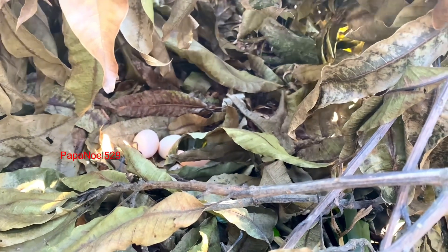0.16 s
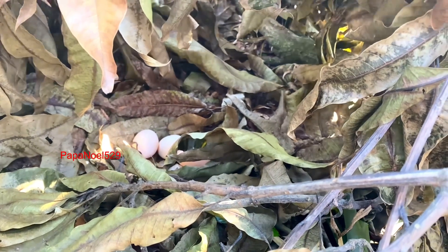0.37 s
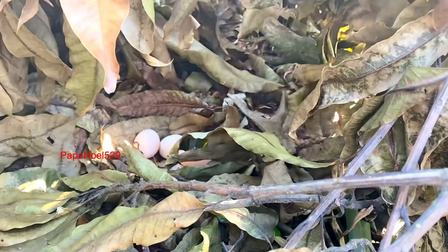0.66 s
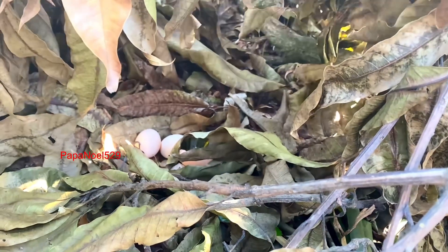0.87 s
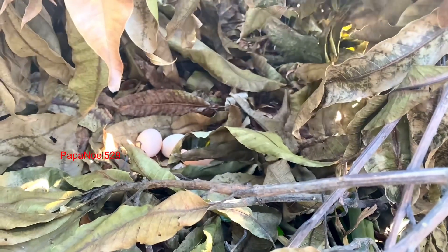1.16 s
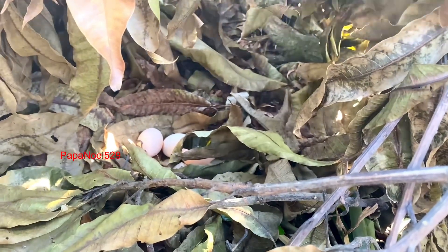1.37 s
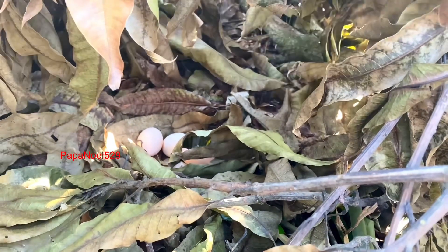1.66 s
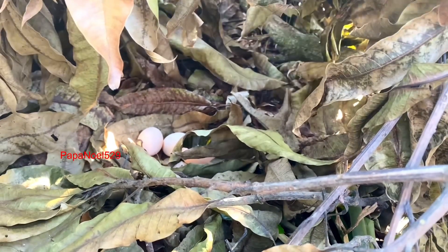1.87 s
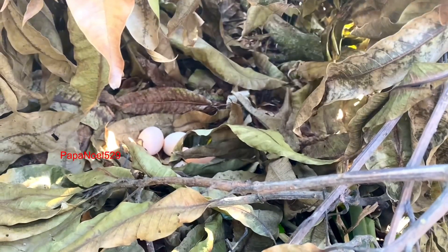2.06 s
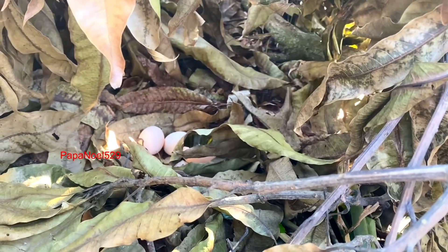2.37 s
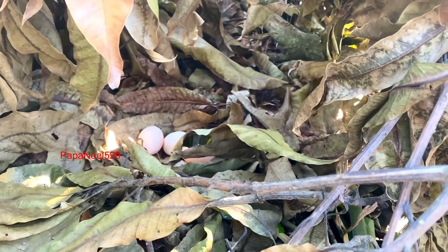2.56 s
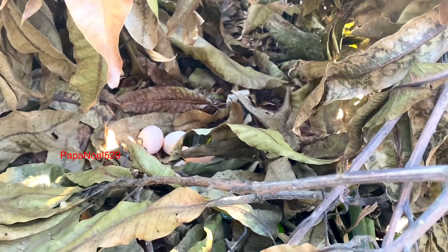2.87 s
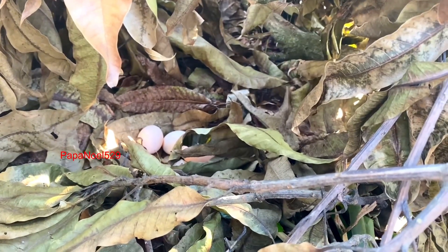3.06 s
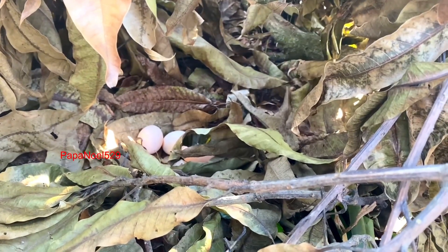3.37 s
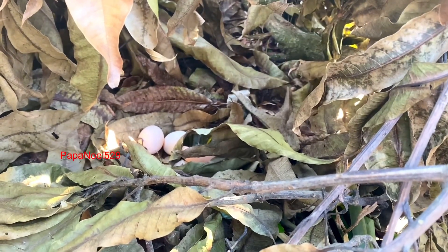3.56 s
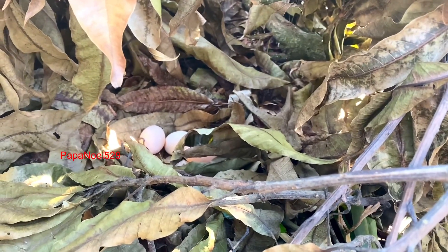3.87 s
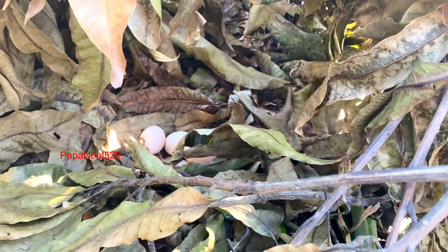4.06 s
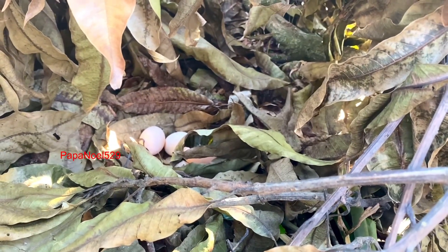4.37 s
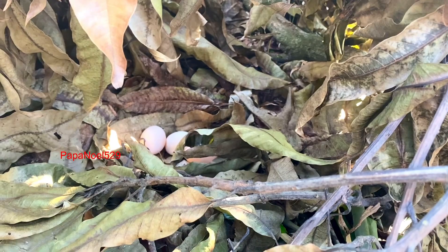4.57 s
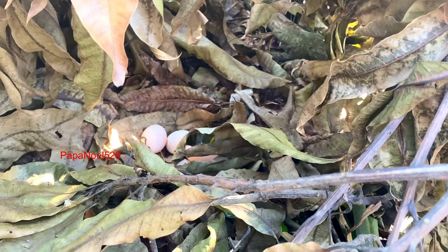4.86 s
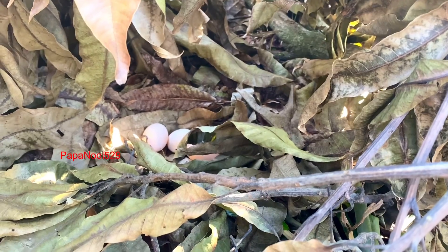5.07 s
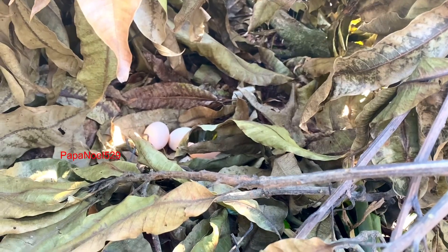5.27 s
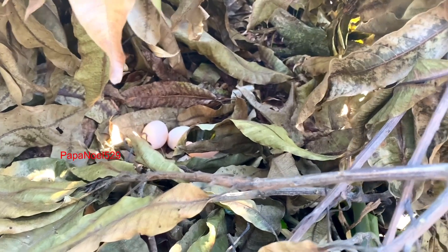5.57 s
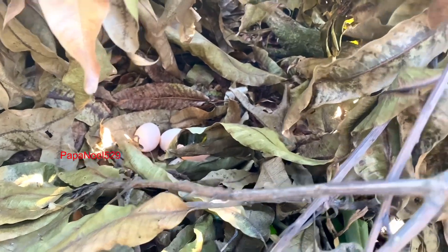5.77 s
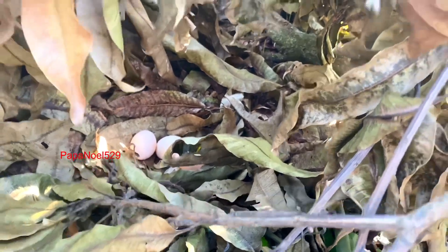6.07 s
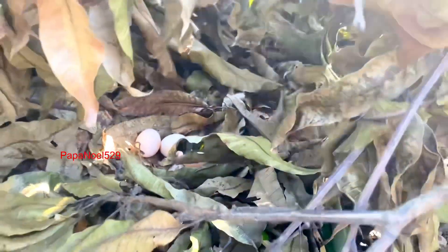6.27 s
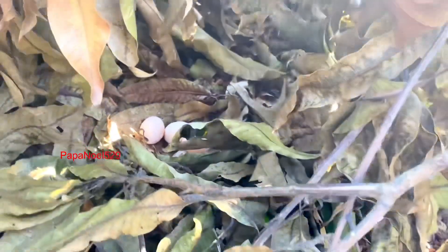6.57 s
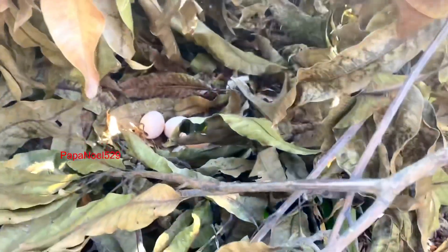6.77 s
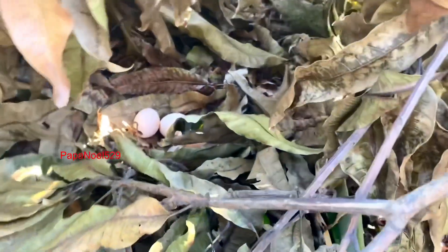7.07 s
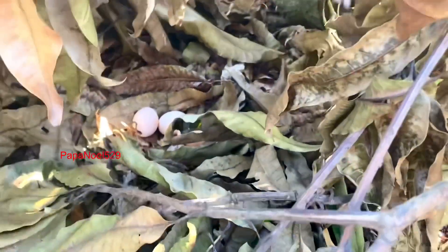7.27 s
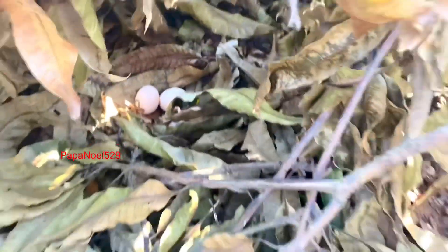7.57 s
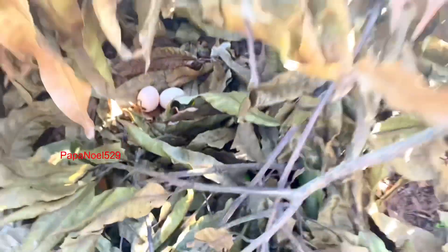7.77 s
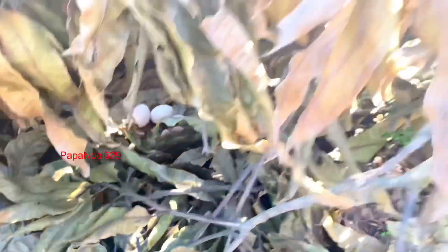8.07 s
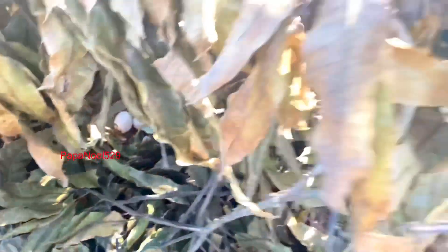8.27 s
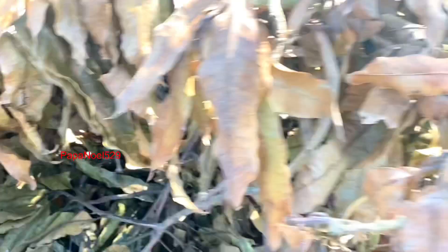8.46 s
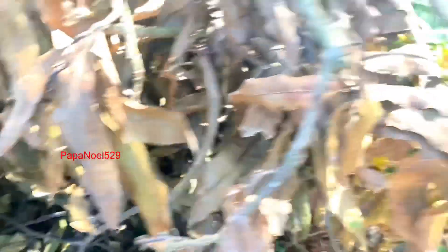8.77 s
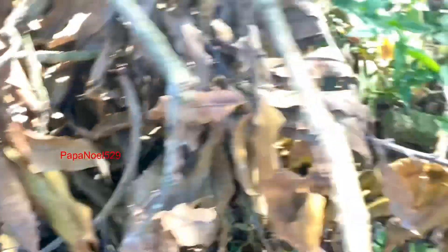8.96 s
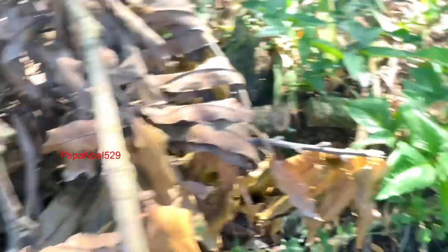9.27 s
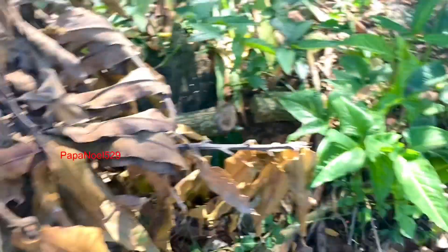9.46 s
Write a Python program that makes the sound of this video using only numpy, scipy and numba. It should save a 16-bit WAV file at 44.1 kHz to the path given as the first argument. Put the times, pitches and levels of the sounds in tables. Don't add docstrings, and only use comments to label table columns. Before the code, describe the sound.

Two hens cackle in turn, quick steady clucks breaking into harsh squawks, while a hand rustles dry leaves and snaps twigs close by.

```python
import sys
import numpy as np
from scipy import signal
from scipy.fft import rfft, irfft, next_fast_len
from scipy.io import wavfile
from scipy.ndimage import uniform_filter1d, map_coordinates
from numba import njit

SR = 44100
rng = np.random.default_rng(int(sys.argv[2]) if len(sys.argv) > 2 else 0)


def elevation(decibels):
    levels = np.asarray(decibels, float)
    return 10 ** (levels / 20)


def wav_record(signal):
    frames = np.transpose(np.atleast_2d(signal))
    bounded = np.clip(frames, -1, 1)
    quanta = np.round(bounded * 32767).astype(np.int16)
    wavfile.write(sys.argv[1], SR, quanta)


N = 424683
TIME = np.arange(N) / SR


def curve(rows):
    s, *columns = np.transpose(rows)
    return [np.interp(TIME, s, c) for c in columns]


def unit(x):
    return x / np.sqrt(np.mean(x ** 2))


def colour(x, points, turn=((60, 0), (200, 0))):
    size = next_fast_len(N)
    log_hz = np.log(np.maximum(np.fft.rfftfreq(size, 1 / SR), 1))

    def at(rows):
        hz, value = np.transpose(rows)
        return np.interp(log_hz, np.log(hz), value)

    spectrum = rfft(x, size) * elevation(at(points)) * np.exp(-1j * at(turn))
    return irfft(spectrum, size)[..., :N]


@njit
def svf(x, g, k):
    y, b, l = np.empty(len(x)), 0., 0.
    for i in range(len(x)):
        v = (b + g[i] * (x[i] - l)) / (1 + g[i] * (g[i] + k[i]))
        b, l, y[i] = 2 * v - b, l + 2 * g[i] * v, k[i] * v
    return y


def steep(x, hz, width):
    g, k = np.tan(np.pi * hz / SR), 1.55 * width / hz
    return svf(svf(x + 1e-18, g, k), g, k)


def walk(rate):
    k = int(SR / rate)
    steps = np.repeat(rng.standard_normal(N // k + 1), k)
    return 1.3 * uniform_filter1d(uniform_filter1d(steps, k), k)[:N]


# (time [s], level [dB])
HUM = [(0, -49.5), (1.5, -47.5), (3.6, -50), (5.2, -55), (7.2, -63.5), (9.63, -59)]
# (time [s], level [dB])
WIND = [(0, -57), (3, -62), (6.5, -53.5), (9.63, -55)]
# (time [s], rise above the wind [dB])
GUSTS = [
    (3.261, 16),
    (3.46, 9),
    (7.5, 7.2),
    (7.59, 11.3),
    (8.1, 5.1),
]
# (frequency [Hz], density [dB per Hz])
YARD = [(130, 1), (300, -15.5), (500, -11), (900, -10), (1450, -61), (2600, -31), (3200, -13.5),
        (3900, -36.5), (7000, -64.5), (16000, -56.5)]


def background():
    hum_hz, wander_hz, gust_s, yard_db = 98.9, 0.7, 0.046, -62.5
    hum_phase = 2 * np.pi * np.cumsum(hum_hz + wander_hz * walk(4)) / SR
    hum = np.sqrt(2) * np.sin(hum_phase) * elevation(curve(HUM)[0] + 1.5 * walk(9))
    hum = hum * elevation(np.array([[-.9], [.9]]))

    wind_db = curve(WIND)[0]
    for s, rise_db in GUSTS:
        wind_db = wind_db + rise_db * np.exp(-((TIME - s) / gust_s) ** 2)
    rumble = [(12, -53.5), (30, -27.0), (55, -5.0), (85, -3.0), (125, -14.5), (300, -23.5), (2000, -93.5)]
    mid, side = colour(rng.standard_normal((2, N)), rumble)
    wind = unit(mid + 0.12 * side * np.array([[1], [-1]])) * elevation(wind_db + 2.0 * walk(9.7))

    hiss = unit(colour(rng.standard_normal((2, N)), [(60, 2.7)] + YARD))
    return hum + wind + hiss * elevation(yard_db + 0.5 * walk(5.7))


# (time [s], rustle level [dB])
LEAVES = [(0, -68.5), (.2, -53), (.6, -60), (1.2, -60), (2.1, -65.5), (2.75, -76.5), (3.8, -84),
          (4.85, -76.5), (5.0, -71.5), (5.45, -70), (6.1, -57), (6.9, -60), (6.95, -51.5), (7.75, -53.5),
          (8.0, -54), (8.4, -61), (8.52, -48.5), (9.46, -64.5), (9.54, -49)]
# (frequency [Hz], density [dB per Hz])
LEAF_COLOUR = [(90, -49.5), (170, -4.5), (760, 1.5), (3770, 1), (6000, 0), (11900, -4.5), (16000, -4)]


def rustle():
    struck = rng.random((2, N)) < 5000 / SR
    grains = struck * elevation(2.3 * rng.exponential(size=(2, N))) * rng.standard_normal((2, N))
    bed = unit(grains) + 0.72 * rng.standard_normal((2, N))
    bed = colour(bed + 0.04 * bed[::-1], LEAF_COLOUR)
    return unit(bed) * elevation(curve(LEAVES)[0] + 12.5 + 3.04 * walk(35) + 3.0 * walk(9))


# (time [s], peak level [dB], ring frequency [Hz], crush length [s])
SNAPS = [(0.0991, -27, 7100, 0.0066), (0.1441, -32.5, 7020, 0.0045), (0.205, -21, 6440, 0.004),
         (0.414, -37.5, 6870, 0.0073), (0.467, -27, 6170, 0.006), (0.8111, -32, 3020, 0.006),
         (0.875, -45, 3190, 0.006), (0.909, -29.5, 4000, 0.0082), (0.967, -24.5, 2990, 0.005),
         (1.29, -56, 3220, 0.006), (1.3543, -26, 3090, 0.0066), (1.372, -32, 3800, 0.006),
         (1.7878, -40, 3500, 0.006), (1.8064, -32, 4390, 0.0073), (3.6034, -49.5, 3620, 0.0084),
         (5.2994, -43, 6900, 0.0065), (6.0881, -52, 4420, 0.0053), (6.107, -42, 4280, 0.006),
         (6.6578, -39, 5170, 0.006), (6.9333, -38, 6350, 0.0055), (6.94, -23, 3990, 0.01),
         (7.103, -40, 4220, 0.006), (7.177, -24, 3095, 0.0068), (7.806, -32, 4960, 0.0053),
         (7.8743, -24, 3970, 0.0066), (7.907, -19, 4860, 0.0046), (7.947, -22, 4900, 0.006),
         (7.9827, -26, 7600, 0.0043), (8.4267, -36, 3200, 0.0054), (8.5066, -47, 6710, 0.0065),
         (8.5116, -33, 2620, 0.006), (8.777, -21, 5340, 0.006), (8.982, -44, 5680, 0.006),
         (9.511, -35.5, 7380, 0.006), (9.593, -17.5, 3160, 0.0067)]


def snaps():
    out = np.zeros((2, N))
    t = np.arange(3000) / SR
    for s, peak_db, hz, crush_s in SNAPS:
        crack = rng.standard_normal((2, len(t)))
        decay = np.exp(-t / max(crush_s, 1e-3)) + 0.18 * np.exp(-t / 0.13)
        burst = (crack + 0.12 * crack[::-1]) * decay * np.clip(t / 0.0015, 0, 1)
        ring = signal.lfilter(*signal.iirpeak(hz, 3.0, fs=SR), burst)
        bright = signal.lfilter([1, -.75], [1], 0.62 * burst + 3.06 * ring)
        i = int(s * SR)
        out[:, i:i + len(t)] += (bright * elevation(peak_db - 7.0))[:, :N - i]
    return out


# (share of length, pulse rate [Hz], level [dB])
CLUCK = [(-.22, 155, -37), (-.2, 162, -17), (.1, 217.6, -7.5), (.4, 245.2, 4), (0.551, 424, -1),
         (.85, 457, -2), (1.05, 372.8, -7), (1.199, 325.6, -23.5)]


def add_cluck(c, cluck, chest_db, rough):
    share, rate_hz, shape_db = np.transpose(CLUCK)
    s, length, peak_db, throat_hz = cluck
    on = slice(int((s + share[0] * length) * SR), int((s + share[-1] * length) * SR))
    u = (TIME[on] - s) / length
    c["db"][on] = peak_db + np.interp(u, share, shape_db)
    chance = 1 + .04 * rng.standard_normal()
    c["hz"][on] = np.interp(u, share, rate_hz) * throat_hz / 900 * chance
    c["half"][on], c["third"][on], c["rough"][on] = .15, 0, rough
    c["throat"][on], c["chest_db"][on] = throat_hz / 960, chest_db


# (time from start [s], level [dB])
ONSET = [(-.004, -22), (0, -29), (.008, -3.5), (.05, 0.5)]
# (time from end [s], level [dB])
OFFSET = [(0, -0.5), (.015, -7.5), (.035, -15.5), (.045, -19), (.08, -26)]


def add_squawk(c, squawk, tuning, vowel, syrinx, effort, throat):
    start, end, level_db, clear_s, hoarse = squawk
    pitch, tune, first_db, stretch = tuning
    on = slice(int((start + ONSET[0][0]) * SR), int((end + OFFSET[-1][0]) * SR))
    t = TIME[on] - start
    broken = 1 + (t - clear_s) / (end - start - clear_s)
    phase = np.where(t < clear_s, t / clear_s, broken)

    def at(rows):
        points, *columns = np.transpose(rows)
        return [np.interp(phase, points, column) for column in columns]

    hz, half, third, rough, strain = at(syrinx)
    c["hz"][on], c["half"][on] = hz * pitch, half
    c["rough"][on] = rough + hoarse * strain
    c["third"][on] = np.minimum(third + 2.5 * hoarse * np.minimum(strain, 1), .75)
    ends_db = np.interp(t, *np.transpose(ONSET)) + np.interp(TIME[on] - end, *np.transpose(OFFSET))
    push_db, open_db, neck = at(effort)
    c["db"][on] = level_db + push_db + ends_db + first_db * np.clip(4 - 4 * phase, 0, 1)
    c["beak_db"][on] = open_db + 0.048 * ends_db
    c["neck"][on], c["throat"][on] = neck * stretch, throat * tune
    c["shut"][on], c["husk"][on] = 0, hoarse
    c["vowel_db"][:, on] = np.c_[list(vowel)]


VOWEL_HZ = [650, 1300, 1900, 2400, 2900, 3500, 4200, 6000]


def gestures(clucks, squawks, tuning, vowels, syrinx, effort, beak, chest_db, rough, throat):
    c = {name: np.zeros(N) for name in ("half", "third", "rough", "chest_db", "husk")}
    c["hz"], c["db"], c["throat"] = np.full(N, 300.), np.full(N, -120.), np.full(N, throat)
    c["beak_db"], c["second_db"] = curve(beak)
    c["neck"], c["shut"] = np.ones(N), np.ones(N)
    c["vowel_db"] = np.zeros((len(VOWEL_HZ), N))
    for cluck in clucks:
        add_cluck(c, cluck, chest_db, rough)
    for squawk, tuned, vowel in zip(squawks, tuning, vowels):
        add_squawk(c, squawk, tuned, vowel, syrinx, effort, throat)
    c["neck"] = c["neck"] * np.where(c["shut"], np.minimum(c["throat"], 1), 1)
    return c


def syrinx_source(hz, half, third, rough, db):
    phase = np.cumsum(hz * (1 + .1 * rough * walk(70))) / SR
    cycle = np.round(phase).astype(int)
    late, strong = 2 * np.tanh(rng.standard_normal((8000, 2)) / 1.8)[cycle].T
    alternate = half * np.cos(np.pi * cycle)
    slip = third * np.cos(2 * np.pi * cycle / 3 + 4 * rough * walk(30))
    off = phase - cycle - np.clip(.11 * rough * late, -.4, .4) - .06 * alternate
    pulses = np.sinc(off / hz * .72 * SR) * np.cos(np.pi * (phase - cycle))
    pulses = pulses * (1 + alternate + slip) * elevation(5 * rough * strong)
    air = .8 * rough * rng.standard_normal(N) * (1 + np.cos(2 * np.pi * off))
    return (pulses * np.sqrt(SR / hz) + air) * elevation(db)


# (frequency [Hz], level [dB])
RASP = [(300, -25), (900, 18), (3500, 9), (7000, 8.5), (15000, -7)]
SECOND_MODE_HZ = (1600, 2200)


def voice(c, pipe, shut_db, hoarse_db, rasp_db):
    hz, rough, db, beak_db, shut, husk = [c[k] for k in ("hz", "rough", "db", "beak_db", "shut", "husk")]
    source = syrinx_source(hz, c["half"], c["third"], rough, db)
    (f, w, throat_db), (low_hz, low_w, low_db), *modes = pipe
    throat_hz = f * c["throat"]
    out = steep(steep(source, throat_hz, 1.5 * w), throat_hz, 1.5 * w)
    out = out * elevation(throat_db + hoarse_db[0] * husk)
    out += steep(source * elevation(low_db + c["chest_db"]), np.full(N, 1. * low_hz), low_w)
    for (f, w, mode_db), extra_db, husk_db in zip(modes, shut_db, hoarse_db[1:]):
        vowel_weights = np.array([np.interp(f, VOWEL_HZ, row) for row in np.eye(len(VOWEL_HZ))])
        opening_db = beak_db * min(f / 2500, 1)
        opening_db = opening_db + shut * extra_db + husk * husk_db + vowel_weights @ c["vowel_db"]
        if SECOND_MODE_HZ[0] < f < SECOND_MODE_HZ[1]:
            opening_db = opening_db + shut * c["second_db"]
        drift = c["neck"] * (1 + .009 * walk(12))
        out += elevation(mode_db + 1.5 * walk(25)) * steep(source * elevation(opening_db), f * drift, w)
    out -= 0.7 * (1 - shut) * steep(out, np.minimum(hz, 400.), 160.0)
    air_db = db + beak_db + rasp_db - 4.3 * shut + 5.0 * walk(37)
    rasp = rng.standard_normal(N) * np.clip(0.66 + 3 * rough, 0, 1) * elevation(air_db)
    return out + colour(rasp, RASP)


def yard_tail(x):
    t60_s, wet_db = 0.23, -26.5
    t = np.arange(SR // 2) / SR
    tail = rng.standard_normal((2, len(t))) * elevation(-60 * t / t60_s) * np.clip(t / 0.0019, 0, 1)
    tail = signal.lfilter([1], [1, -.65], tail)
    tail = tail / np.sqrt(np.sum(tail ** 2) / 2)
    return signal.fftconvolve(x[None], elevation(wet_db) * tail)[:, :N]


def leaf_scatter(x, scatter_hz, scatter_db):
    decay_s = .005
    t = np.arange(1500) / SR
    sway = 2 * np.pi * .9 * TIME + 1.5 * walk(8)
    high = signal.butter(2, scatter_hz, "high", fs=SR)
    out = np.zeros((2, N))
    for weight in (np.cos(sway), np.sin(sway)):
        paths = signal.lfilter(*high, rng.standard_normal((2, len(t))) * np.exp(-t / decay_s))
        paths = paths / np.sqrt(np.sum(paths ** 2) / 2)
        out += signal.oaconvolve((x * weight)[None], elevation(scatter_db) * paths)[:, :N]
    return out


def place(x, lag_ms, pan_db, balance, shift, scatter_hz, scatter_db):
    tilt = np.array(balance) * [1, .5]
    arrival = np.arange(N) - lag_ms * SR / 1000
    left = map_coordinates(colour(x, tilt, shift), [arrival], order=3)
    right = colour(x, tilt * [1, -1])
    direct = np.array([left * elevation(pan_db / 2), right * elevation(-pan_db / 2)])
    return direct + yard_tail(x) + leaf_scatter(x, scatter_hz, scatter_db)


# (time [s], left lags near hen [ms], near left minus right [dB],
# left lags far hen [ms], far left minus right [dB])
TURN = [
    (0, 0.21, -4.5, -0.27, 4),
    (1.6, 0.21, -4, -.2, 4),
    (4, .22, -5, -.2, 2.5),
    (6, .22, -3.5, -.2, 6.5),
    (7.5, 0.19, -1.5, -0.14, 1),
    (8.2, 0.19, -5, -0.23, 5),
    (9.6, .12, -5.5, 0.058, -10),
]


def phone_turn():
    return curve(TURN)


# (time [s], length [s], peak level [dB], throat frequency [Hz])
NEAR_CLUCKS = [(.118, 0.057, -26, 858), (.378, 0.042, -26, 843.3), (.623, 0.058, -26.5, 838.7),
               (.84, 0.043, -26, 851.5), (1.064, 0.045, -26, 903.3), (1.298, 0.049, -24.5, 861.7),
               (1.525, 0.044, -22.5, 899.5), (1.769, 0.046, -23.5, 932.4), (2.428, 0.049, -26, 949.8),
               (2.694, 0.038, -24.5, 951.2), (2.996, 0.037, -28.5, 931), (3.25, 0.042, -27.5, 919.2),
               (3.503, 0.045, -30, 906.3), (3.75, 0.045, -28.5, 950), (4.358, 0.04, -25.5, 915.7),
               (4.654, 0.043, -24.5, 966.4), (4.896, 0.041, -24, 950), (5.158, 0.04, -26, 933.8),
               (5.4, 0.042, -25.5, 952), (5.996, 0.043, -19, 951.9), (6.26, 0.042, -30, 845.5),
               (6.548, 0.043, -25, 926.4), (6.813, 0.033, -23.5, 875.8), (7.073, 0.035, -27, 906.6),
               (7.311, 0.047, -26, 900.4), (7.893, 0.067, -24.5, 873), (8.135, 0.05, -27.5, 914),
               (8.374, 0.051, -24, 891.4), (8.623, 0.047, -22.5, 919.6), (8.914, 0.047, -25.5, 876.6)]
# (start [s], end [s], level [dB], clear opening [s], hoarseness [0-1])
NEAR_SQUAWKS = [
    (1.877, 2.17, -25, 0.068, 0.15),
    (3.867, 4.157, -23, 0.011, 0.1),
    (5.51, 5.795, -18.5, 0.068, 0.06),
    (7.415, 7.678, -18.5, .09, 0.02),
    (9.029, 9.297, -18.5, 0.085, 0.02),
]
# (pulse rate factor, throat factor, push in the opening [dB], windpipe factor)
NEAR_TUNING = [(1.0, 1.04, 1.5, 1.007), (0.97, 1.12, -7, 1.01), (1.0, 1.11, -0.5, 1.056),
               (0.97, 1.06, -1, 1.006), (0.95, 0.987, 1.2, 0.995)]
NEAR_VOWELS = [(3.5, 1.5, 3.2, 1.5, 0, 4, 4, 0.26), (2, -7, 2.5, 2.5, 0.5, -6, 2.5, -0.5),
               (3.5, -2, 2, .6, 5.7, 4.5, -0.5, 1), (3.5, 8.5, 8.5, 6, 5, 1, -3, 0.25),
               (4, 7, -0.5, .6, 0.5, .6, -7.5, -1.6)]
# (phase [0-1 clear, 1-2 broken], pulse rate [Hz], every 2nd pulse weak [0-1],
# every 3rd pulse strong [0-1], roughness [0-1], share of hoarseness [factor])
NEAR_SYRINX = [(0, 218, 0, 0, .12, 1), (.24, 330, .1, 0, .08, 1), (.28, 790, .55, 0, .03, .4),
               (.62, 815, .45, 0, .03, .4), (.66, 385, .1, 0, .05, .5), (.95, 368, .2, 0, .08, .7),
               (1.08, 342, .15, .3, .26, 1.8), (1.5, 335, .12, .35, .28, 1.8), (2, 345, .15, .3, .26, 1.8)]
# (phase [0-2], level [dB], beak opening [dB], windpipe tuning [factor])
NEAR_EFFORT = [(0, -3.5, -12.5, .98), (.45, 4, -8.5, 1.0), (.7, 0, -6.5, 0.96), (1.05, 1.2, -8.5, 0.88),
               (1.5, -0.7, -8.5, 0.93), (2, -0.24, -9.5, 0.95)]
# (time [s], cluck opening [dB], second windpipe mode [dB])
NEAR_BEAK = [(0, -17, 3), (1.199, -21.5, 2), (1.798, -19, .6), (2.7, -22, 7), (3.3, -26, 13),
             (3.8, -22, 5.5), (4.7, -20, 1), (5.0, -20, 3), (5.2, -16.5, 5.5), (5.5, -11.5, -4),
             (6.0, -16.5, -0.5), (6.5, -19, -1), (7.2, -17, -2), (8, -17, 10), (8.5, -20, .6),
             (9.6, -19, .6)]
# (frequency [Hz], width [Hz], level [dB])
NEAR_PIPE = [(990, 240, 0), (340, 380, -34), (610, 240, -14), (1290, 200, -6), (1750, 250, -17),
             (2050, 200, -13), (2350, 150, -15), (2700, 170, -11), (2950, 160, -16), (3480, 250, -17),
             (4150, 300, -14), (5200, 600, -25), (6400, 600, -25), (8200, 1200, -30)]
NEAR_SHUT_DB = [-1, -0.5, -2, 3.5, 0, -2.5, -15, 10, -0.5, -20, -2.5, -17.5]
NEAR_HOARSE_DB = [27, -17, -18, 1, 56.5, -19, 34, -13, 4, -1, 6.5, 17.5, -60]
# (frequency [Hz], left minus right [dB])
NEAR_BALANCE = [(300, 1), (900, 0), (1500, 3), (2000, 1), (3000, 2), (4200, 7), (5000, 6), (8000, 1)]
# (frequency [Hz], turn [rad])
NEAR_SHIFT = [(60, .3), (300, 1.1), (450, 1.0), (600, 1.75), (1000, 1.3), (2000, 1.2), (2600, 1.9),
              (4000, 1.4)]


def near_hen():
    lag_ms, pan_db, _, _ = phone_turn()
    controls = gestures(NEAR_CLUCKS, NEAR_SQUAWKS, NEAR_TUNING, NEAR_VOWELS, NEAR_SYRINX, NEAR_EFFORT,
                        NEAR_BEAK, chest_db=13.5, rough=0.18, throat=0.93)
    call = voice(controls, NEAR_PIPE, NEAR_SHUT_DB, NEAR_HOARSE_DB, rasp_db=-33.0)
    return elevation(17.5) * place(call, lag_ms, pan_db, NEAR_BALANCE, NEAR_SHIFT,
                             scatter_hz=2390.0, scatter_db=1.5)


# (time [s], length [s], peak level [dB], throat frequency [Hz])
FAR_CLUCKS = [(.995, 0.038, -53.5, 881), (1.212, 0.047, -48.5, 831), (1.443, 0.056, -46, 835.6),
              (1.671, 0.047, -43, 883.7), (2.764, 0.038, -42, 906), (4.756, 0.042, -42.5, 909),
              (5.008, 0.044, -44, 872), (6.132, 0.054, -42.5, 898), (6.722, 0.04853, -47.5, 864.2),
              (8.532, 0.032, -38, 857.3), (8.793, 0.042, -38, 973.5), (9.394, 0.064, -46, 900)]
# (start [s], end [s], level [dB], clear opening [s], hoarseness [0-1])
FAR_SQUAWKS = [
    (2.256, 2.577, -32.5, 0.18, 0.0055),
    (4.234, 4.571, -33.5, 0.16, .17),
    (6.216, 6.512, -35, .11, 0.106),
    (8.003, 8.314, -31.5, 0.14, 0.21),
]
# (pulse rate factor, throat factor, push in the opening [dB], windpipe factor)
FAR_TUNING = [(1.0, 1.025, 3, 1.008), (1.02, 1.02, -0.5, 1.024), (0.98, 1.007, 1, 0.968),
              (.98, 0.962, -2.5, 1.013)]
FAR_VOWELS = [(-1.1, -9, -1.5, 1.5, 1.4, 2.62, -1.5, .6), (-0.98, -1.1, -2, 6, 0.98, 2.04, 1, 0.68),
              (0.87, 7, .6, 4, 0.77, 0.51, 0.98, 0.84), (.6, .6, -2, -0.5, 0.37, 0.48, 0.62, 0.55)]
# (phase [0-1 clear, 1-2 broken], pulse rate [Hz], every 2nd pulse weak [0-1],
# every 3rd pulse strong [0-1], roughness [0-1], share of hoarseness [factor])
FAR_SYRINX = [(0, 500, .2, .2, .5, 1), (.07, 520, .2, .2, .5, 1), (.13, 635, 0, 0, .02, 1.3),
              (.5, 655, 0, 0, .02, 1.2), (.6, 668, .5, 0, .03, 1.1), (1, 678, .5, 0, .04, 1.2),
              (1.06, 670, .25, .55, .24, 2), (1.4, 660, .15, .55, .17, 1.8), (1.7, 650, .15, .45, .18, .9),
              (2, 630, .15, .35, .18, .5), (2.2, 580, .25, .4, .6, .5)]
# (phase [0-2], level [dB], beak opening [dB], windpipe tuning [factor])
FAR_EFFORT = [(0, -0.2, -12.5, 1), (.15, 2, -4, 0.99), (1, -5, 4.5, 0.93), (1.25, -2, -0.5, 0.96),
              (2, -2.5, -3, 0.928)]
# (time [s], cluck opening [dB], second windpipe mode [dB])
FAR_BEAK = [(0, -14.5, .6), (2.8, -11.5, .6), (5, -12, .6), (9.6, -20.5, 0.55)]
# (frequency [Hz], width [Hz], level [dB])
FAR_PIPE = [(928, 296, 1), (410, 430, -39.5), (641, 101, -5.5), (1267, 450, -14), (1925, 400, -5.5),
            (1982, 150, 0), (2297, 110, -5.5), (2950, 370, -6), (3426, 480, -12), (4750, 250, -12),
            (6900, 1600, -19), (9298, 470, -34.5)]
FAR_SHUT_DB = [-8.5, 7.5, 2.5, -9, -4, 1, -26, -14, -19, -15]
FAR_HOARSE_DB = [14.5, -42.5, -24.5, -1, -9, 11, -5.5, 19.5, -15.5, -2.5, 7]
# (frequency [Hz], left minus right [dB])
FAR_BALANCE = [(300, -2), (550, 4), (1000, -2), (1900, -8), (3500, -3), (5500, 0), (7500, -6)]
# (frequency [Hz], turn [rad])
FAR_SHIFT = [(60, .3), (300, 1.1), (500, 1.2)]


def far_hen():
    _, _, lag_ms, pan_db = phone_turn()
    controls = gestures(FAR_CLUCKS, FAR_SQUAWKS, FAR_TUNING, FAR_VOWELS, FAR_SYRINX, FAR_EFFORT,
                        FAR_BEAK, chest_db=21.4, rough=0.1511, throat=1.021)
    call = voice(controls, FAR_PIPE, FAR_SHUT_DB, FAR_HOARSE_DB, rasp_db=-32.5)
    return elevation(19.0) * place(call, lag_ms, pan_db, FAR_BALANCE, FAR_SHIFT,
                             scatter_hz=1200., scatter_db=0.0)


def scene():
    return background() + rustle() + snaps() + near_hen() + far_hen()


def top_cut(x):
    return signal.sosfilt(signal.butter(12, 16950, fs=SR, output="sos"), x)


# (frequency [Hz], level [dB])
MID_TOP = [(12300, 0), (12700, -55), (14000, -55), (14600, 0), (15800, 0), (16000, -70)]
# (frequency [Hz], level [dB])
SIDE_TOP = [(8500, 5), (10000, -3), (12000, -4), (12600, 0), (14300, 0), (14900, -30), (16000, -70)]


def record(dry):
    left, right = dry
    mid = colour((left + right) / 2, MID_TOP)
    side = colour((left - right) / 2, [(7000, 0.011)] + SIDE_TOP)
    stereo = np.array([mid + side, mid - side])
    limited = 0.72 * np.tanh(stereo / 0.78)
    return top_cut(limited)


dry = scene()
out = record(dry)
wav_record(out)
```